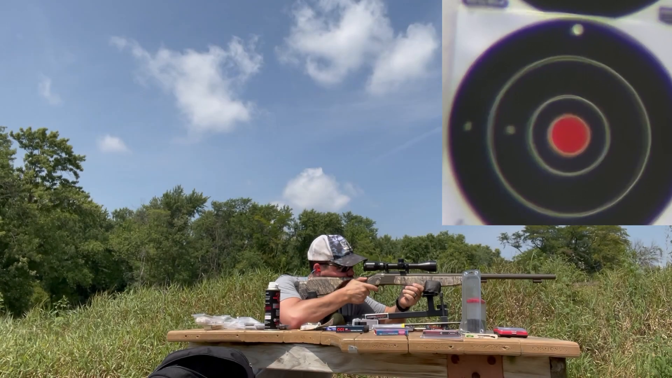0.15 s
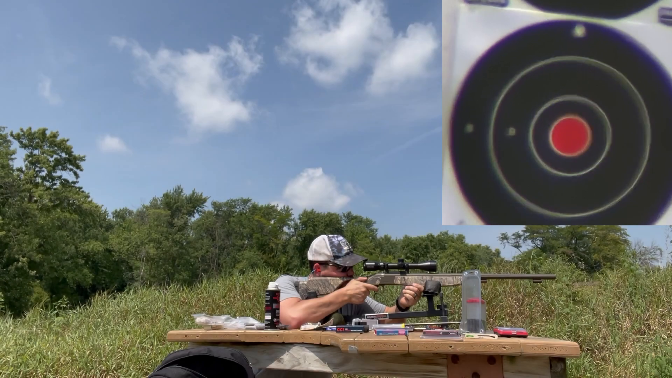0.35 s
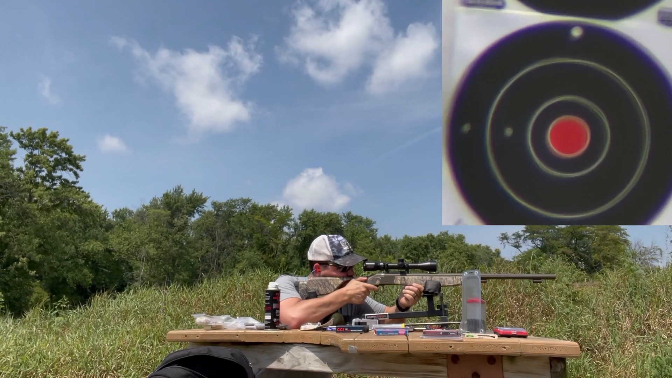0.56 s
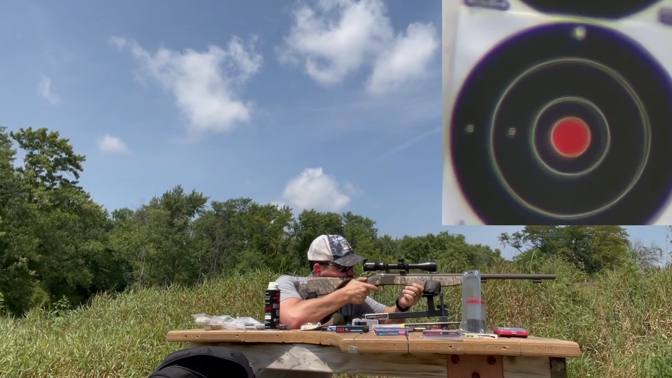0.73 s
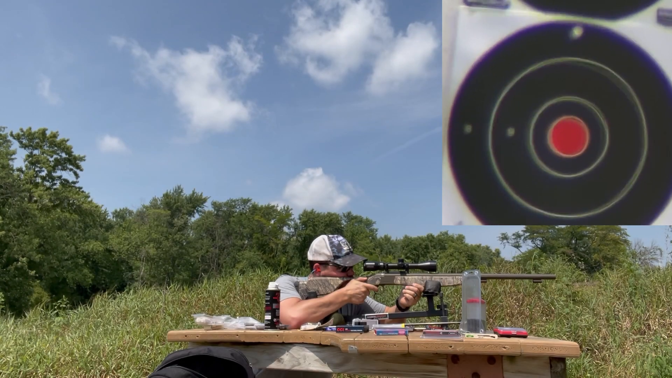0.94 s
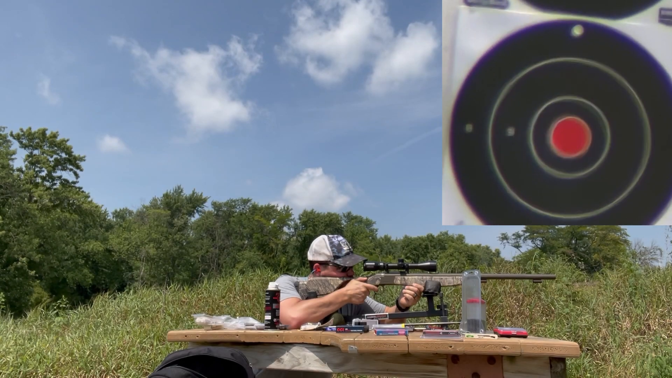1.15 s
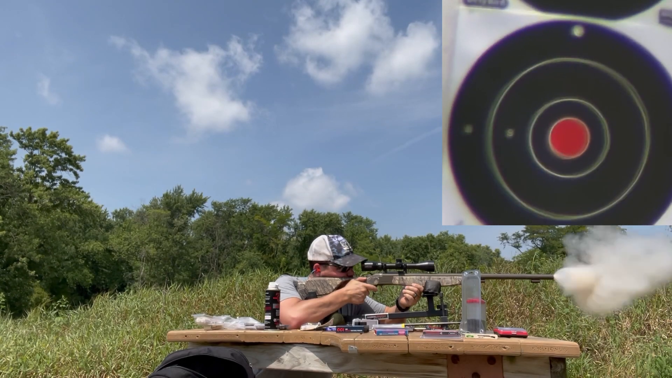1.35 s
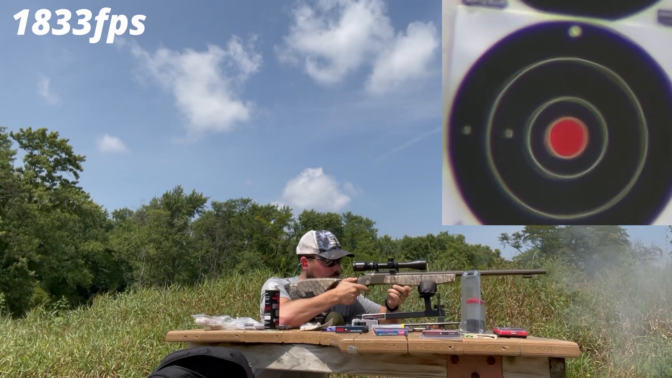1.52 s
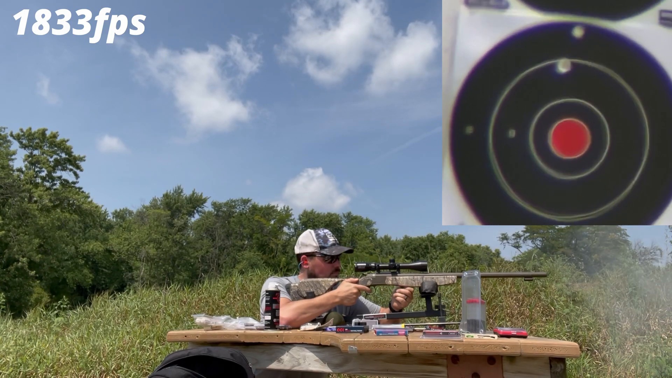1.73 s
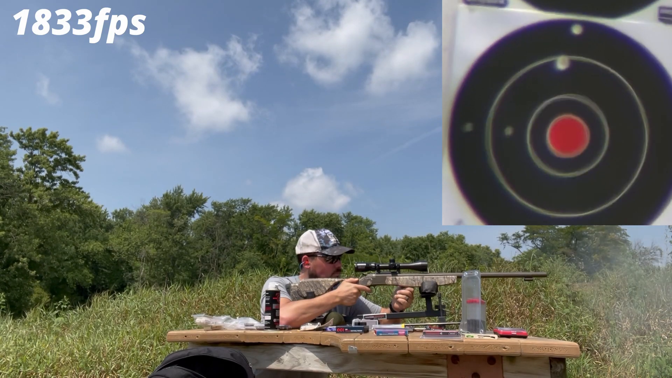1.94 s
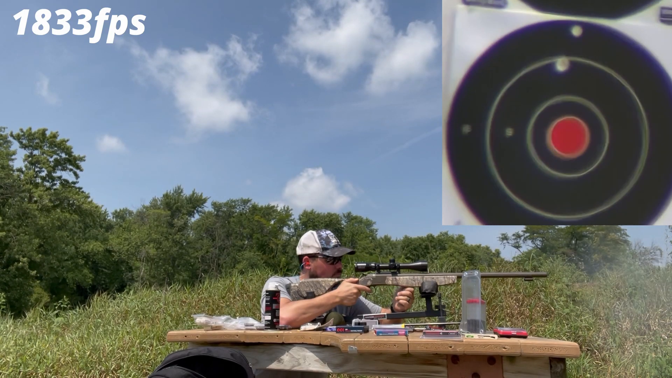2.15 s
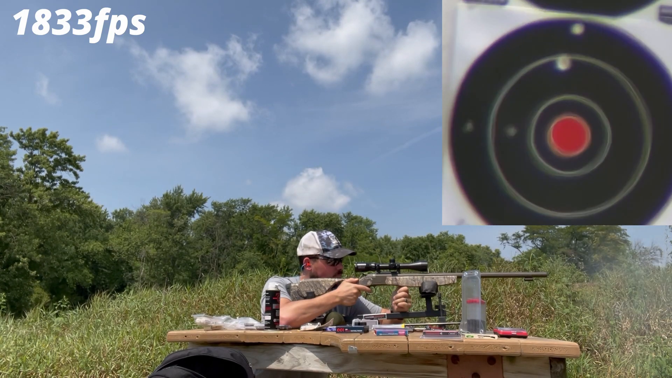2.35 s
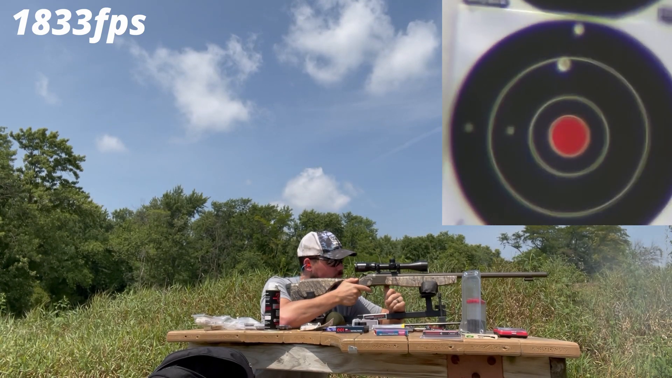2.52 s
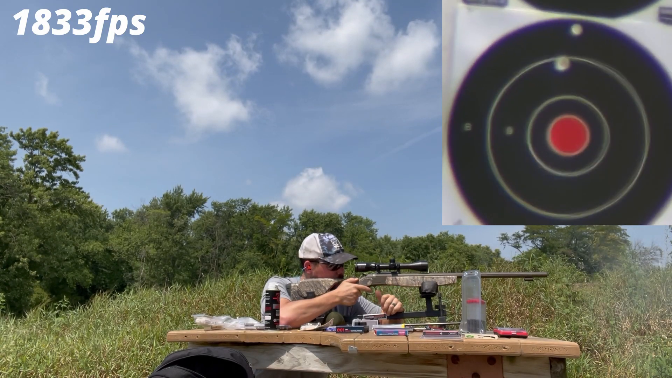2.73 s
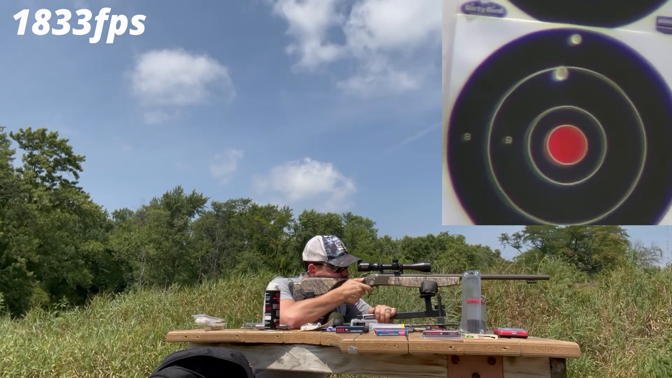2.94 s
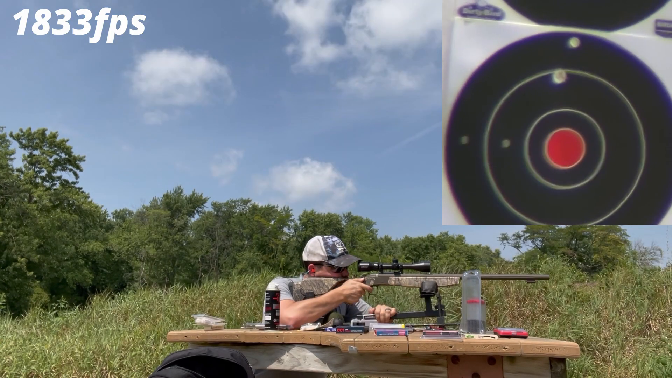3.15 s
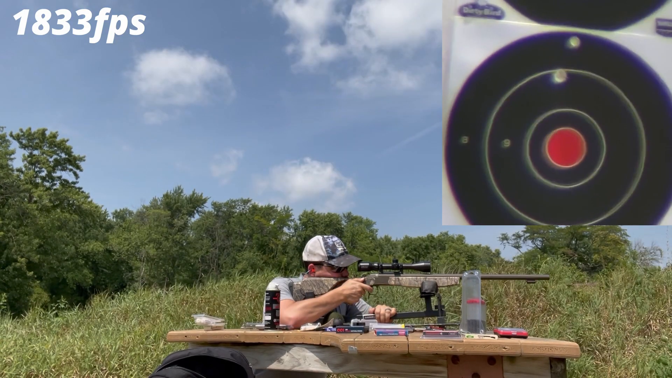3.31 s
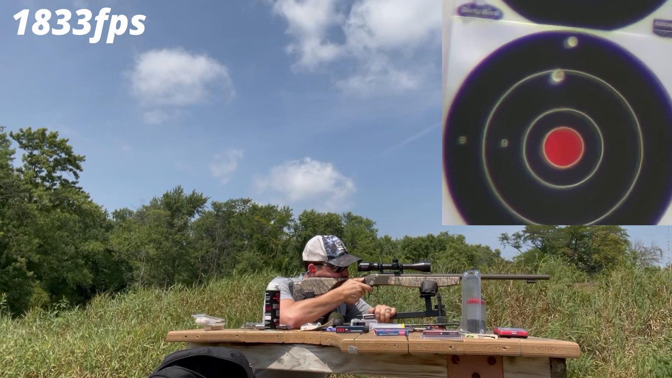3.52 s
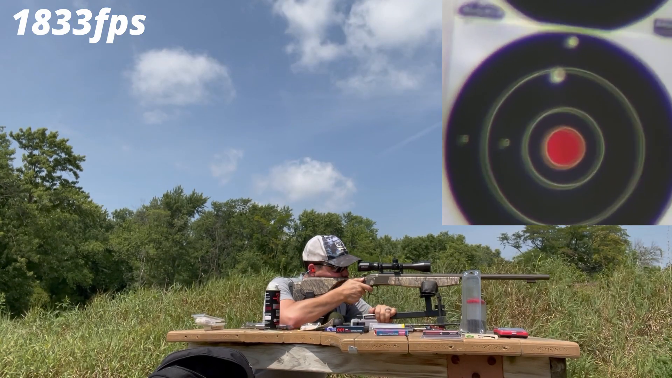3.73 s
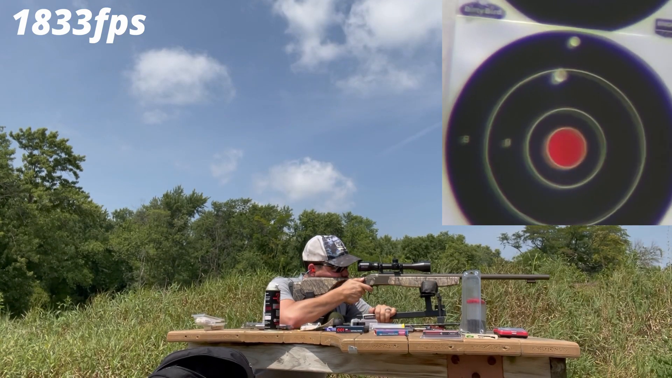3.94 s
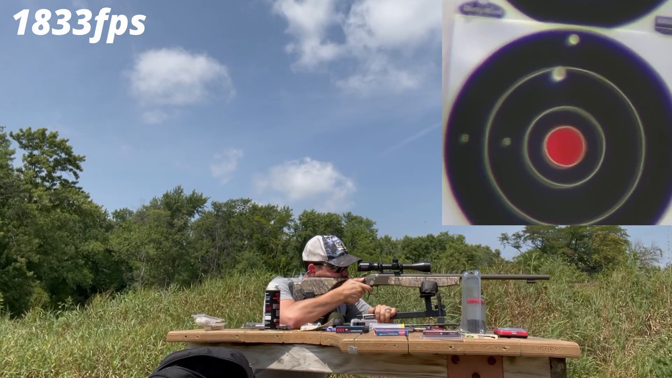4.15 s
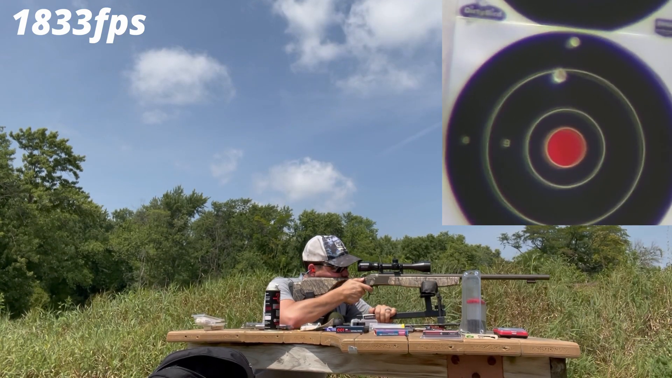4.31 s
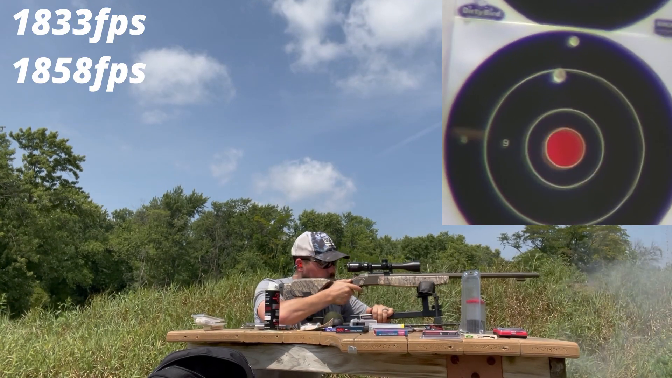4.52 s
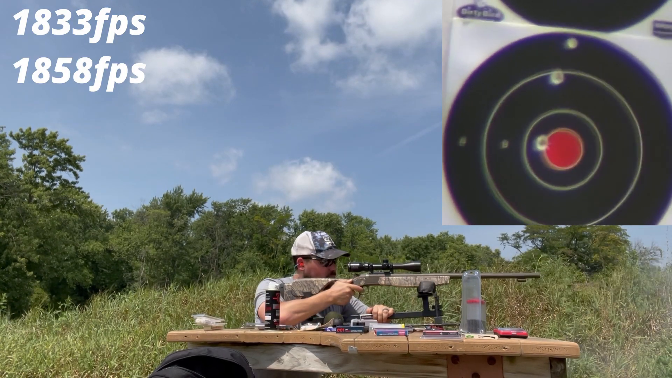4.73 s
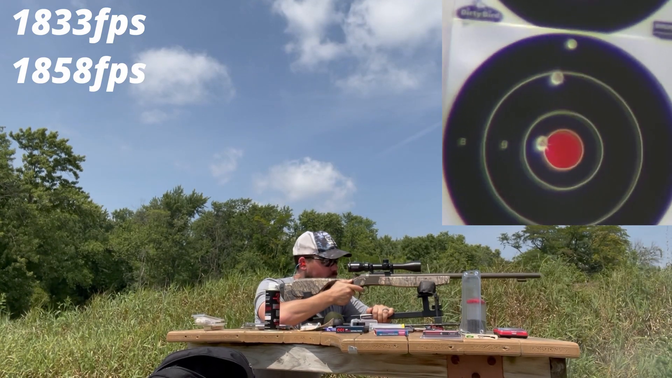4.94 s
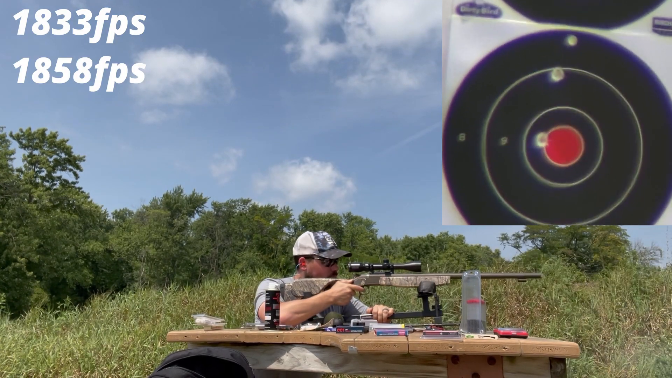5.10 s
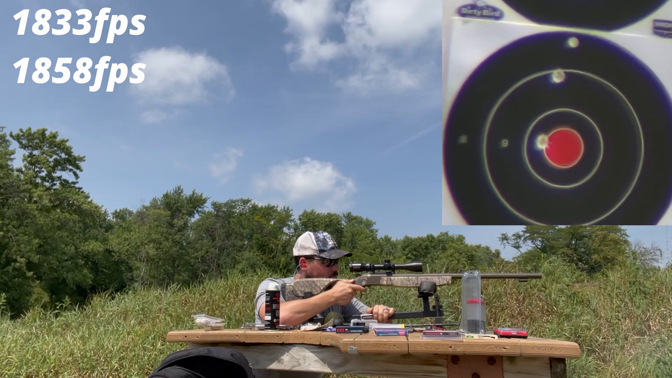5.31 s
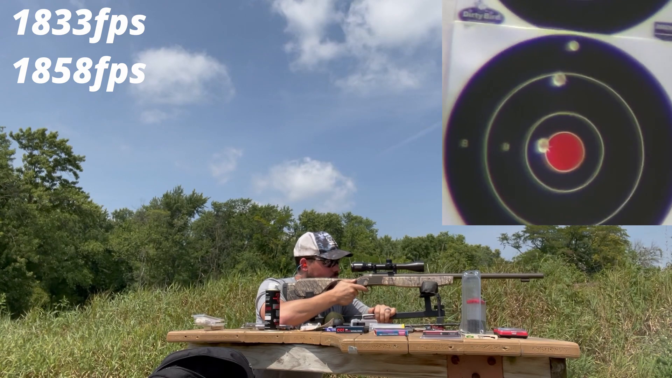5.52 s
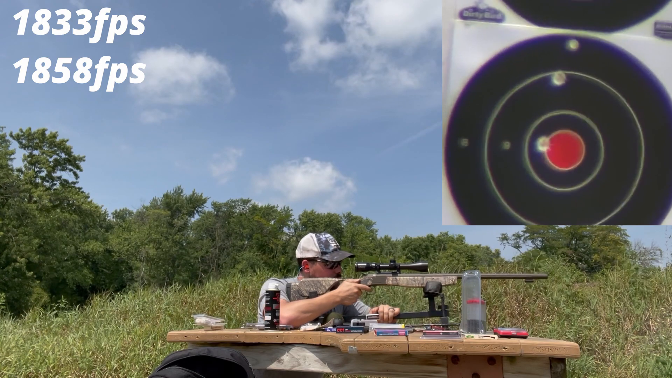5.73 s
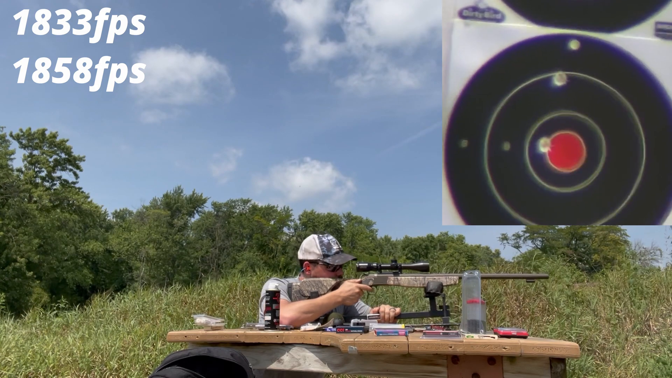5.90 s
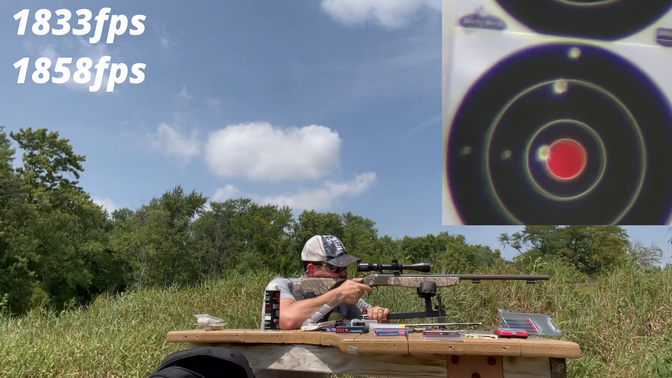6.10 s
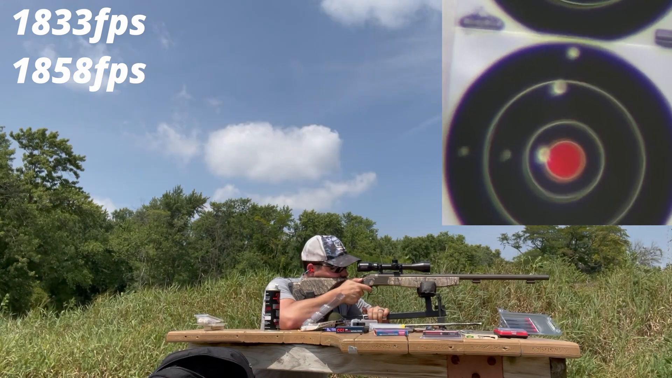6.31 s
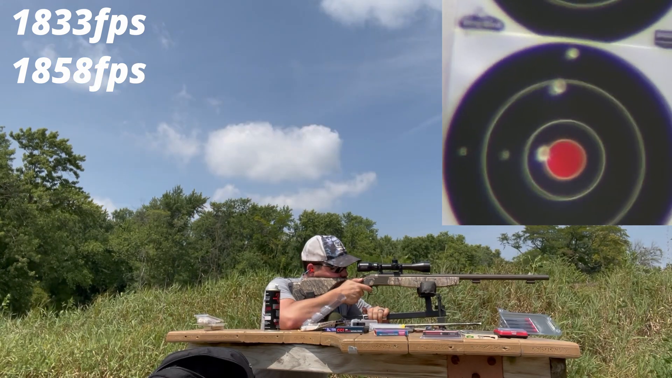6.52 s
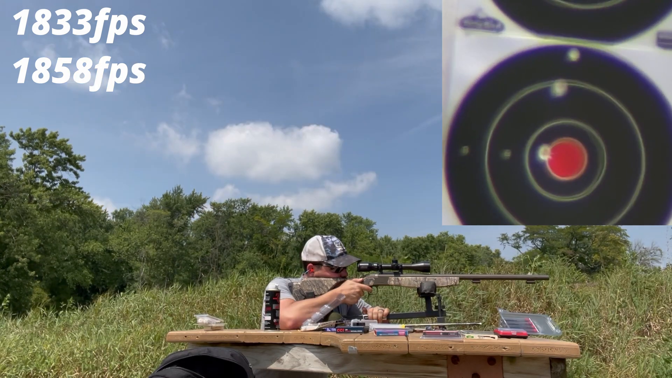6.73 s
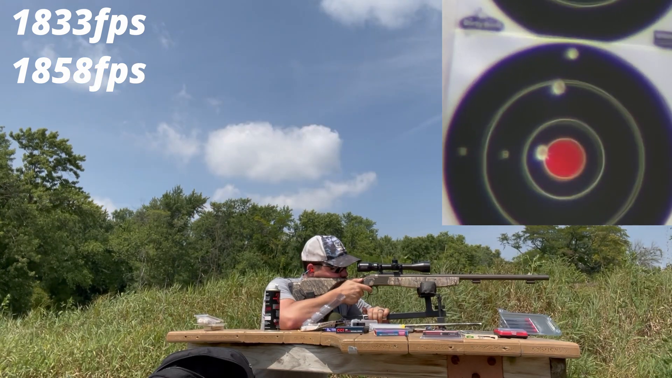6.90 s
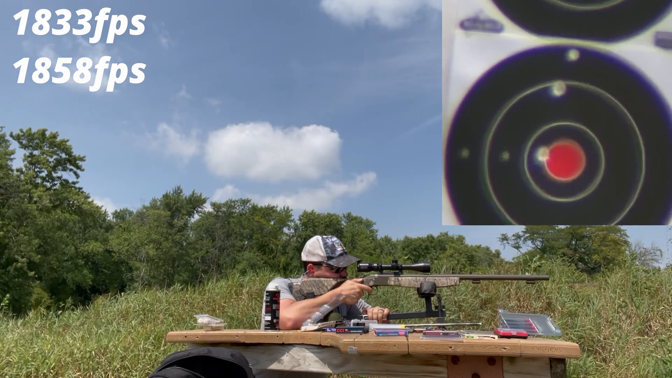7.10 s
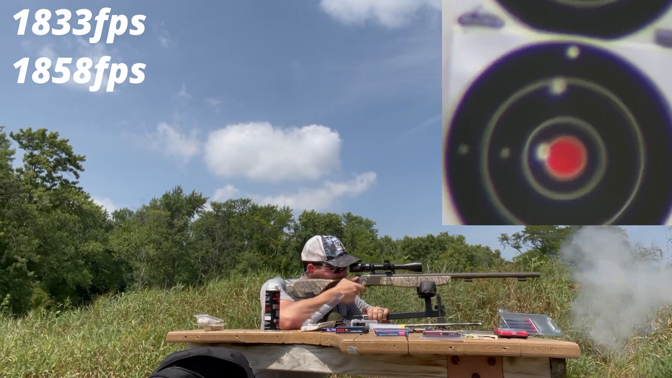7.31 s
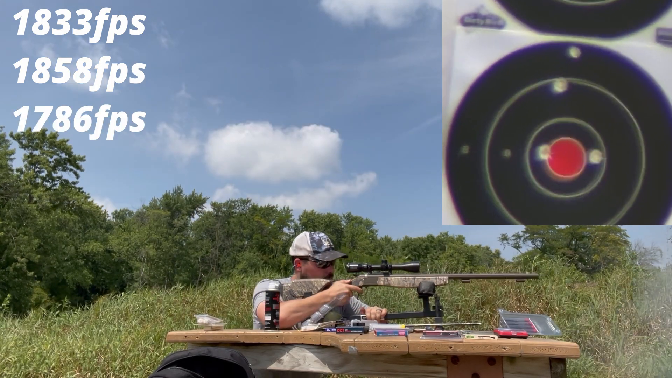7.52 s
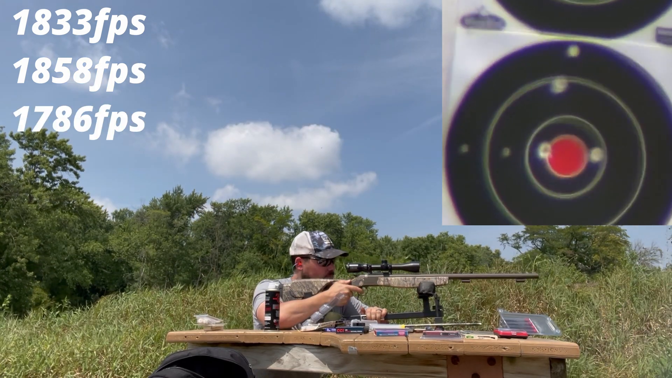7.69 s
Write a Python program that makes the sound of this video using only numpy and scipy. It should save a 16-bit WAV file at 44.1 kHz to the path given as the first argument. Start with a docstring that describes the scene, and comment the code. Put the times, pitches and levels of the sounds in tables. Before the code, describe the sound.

Three loud rifle shots crack and boom across a meadow, echoing off trees, with faint insect trills between and wind bumping the microphone later.

```python
"""In a summer meadow, insects trill and buzz; a thin chirp and dry ticks precede the first muzzleloader shot.
Each shot cracks as a sum of ringing partials, booms as a falling sine in noise bursts, then echoes from a tree
line as filtered noise; the insect sound is fainter at once, and slowly grows louder after a second.
A hard cut leads to a windier scene, with gusts and bumps of low noise, a shot, then three sine chirps.
Another cut leads to the strongest bumps on the microphone, then the third shot and its echoes."""
import sys
import numpy as np
from scipy import signal
from scipy.fft import rfft, irfft, next_fast_len
from scipy.io import wavfile
from scipy.ndimage import uniform_filter1d, map_coordinates

SR = 44100
rng = np.random.default_rng(int(sys.argv[2]) if len(sys.argv) > 2 else 0)


def inscribe(sig):
    """Save sig as 16-bit PCM at rate SR to the path in sys.argv[1].

    A 1-D sig is mono; a 2-D sig holds one channel per row.
    Samples are clipped to [-1, 1] before scaling.
    """
    pcm = np.round(np.clip(np.atleast_2d(sig).T, -1, 1) * 32767)
    wavfile.write(sys.argv[1], SR, pcm.astype(np.int16))


N = 346317

# Levels in the tables are relative: the functions add their own envelopes and gains.
# edges of the three scenes: [t/s]
SCENE_EDGES = [0, 2.974, 6.013, 7.86]
# shots: [t/s, ring length/s, rasp level/dB, gain of far echoes/dB, echo rumble level/dB,
#         extra echo delay/s, gain of sharp echoes/dB, gain of jolts/dB]
SHOTS = [(1.3498, 0.015, -15, 0, -10, -0.0019, 0, 0), (4.3601, 0.02, -18, 7, -11.5, 0.0026, 5, -4.5),
         (7.3277, 0.018, -19, 0, -10.5, -.001, -2.5, -25)]
# partials ringing in each crack: [f/Hz, left level/dB, right level/dB]
RING_FIRST = [(385, -28.5, -11), (570, -35, -28), (1103, -10.5, -22.5), (1256, -20, -24.5),
              (2030, -15, -28), (2640, -52, -25.5), (3000, -43, -31.5), (3149, -28.5, -44.5),
              (3400, -21, -25), (3520, -18, -32), (3900, -22, -40), (4020, -14.5, -21),
              (5130, -27.5, -35.5), (6040, -29, -29.5), (7500, -28.5, -33)]
RING_SECOND = [(719.6, -11.5, -6.5), (1076, -15, -22), (1140, -23, -34.5), (1458, -17, -45),
               (2540, -18, -46.5), (2750, -19, -47.5), (3000, -25.5, -60), (3610, -22.5, -46.5),
               (3940, -27, -22), (4380, -34.5, -16.5), (4430, -39, -40.5), (4720, -20.5, -34.5),
               (5520, -57.5, -29.5), (6653, -29.5, -26), (7800, -25, -36.5)]
RING_THIRD = [(495, -49.5, -24), (882, -10, -20), (1045, -16.5, -27), (1165, -27, -43), (1455, -21, -41),
              (1910, -19.5, -26), (2420, -22, -40), (2860, -24, -39), (3170, -18, -21.5), (3520, -23, -54),
              (3800, -52.5, -28), (4670, -25, -23), (5840, -42.5, -26), (7650, -29, -25), (7940, -30, -28)]
# muzzle gas behind each crack: [delay/s, puff level/dB, nominal boom f/Hz, boom level/dB,
#                                knock f/Hz, knock level/dB, thud level/dB]
BLASTS = [(.0185, -15.5, 97, -6, 280, -10, -23), (.0235, -18, 85, -3, 285, -7, -27.5),
          (0.018, -8, 110.6, -7.5, 320, -14.5, -24)]
# low jolts that follow each shot: [delay/s, smack level/dB, push level/dB]
JOLTS = [(0.062, -43.5, -31.5), (0.101, -64, -33), (.194, -44, -36)]
# broad surfaces that reflect each shot whole: [delay/s, level/dB, body level in the spectrum/dB]
REFLECTORS = [(.235, -33.5, 14), (.312, -32.5, -26), (.37, -23.5, -18), (.3935, -18, -4.5),
              (.454, -23, -11), (.529, -24.5, -7)]
# belts of growth that scatter each shot back: [delay/s, level/dB, rise/s, t60/s]
THICKETS = [(.095, -51.5, .01, 0.52), (.218, -33.5, 0.018, 0.24), (.325, -47, 0.014, .6),
            (0.36, -28.5, 0.023, 0.54), (.375, -35.5, .03, 3.9), (0.508, -34.5, 0.0078, 1.13)]
# insects in each scene: [trill f/Hz, trill level/dB, buzz level/dB, rasp level/dB, air level/dB]
INSECTS = [(4520, -63, -66.5, -83.5, -76), (4440, -67.5, -66.5, -82.5, -64.5), (4415, -62.5, -69, -83, -64)]
# thin chirps: [t/s, length of main swell/s, f/Hz, level/dB]
CHIRPS = [(0.113, .06, 3450, -82), (5.245, 0.05, 5040, -61), (5.568, 0.047, 5010, -64),
          (5.823, 0.072, 4980, -62.5)]
# faint dry ticks in the grass: [t/s, level/dB]
TICKS = [(0.7884, -67), (0.8415, -62), (0.8959, -60)]
# wind in each scene: [steady breeze level/dB, flutter level over rumble/dB, f/Hz below which the sound is mono]
BREEZES = [(-72, -15.5, 15), (-59, -21, 640), (-45.5, -10, 617)]
# gusts: [t of peak/s, strength level/dB, half width/s]
GUSTS = [(.2, -60, 0.077), (3.601, -32.5, .025), (3.709, -28, .06), (4.02, -44.5, 0.12),
         (4.158, -38, 0.017), (6.03, -36, 0.016), (6.22, -37, 0.071), (6.46, -38, .04), (6.72, -33, 0.079),
         (6.95, -40, .06), (7.25, -38.5, 0.095)]
# hard eddies that hit the microphone: [t/s, smack level/dB]
BUMPS = [(3.586, -57), (3.656, -41.5), (6.164, -36), (6.344, -39), (6.437, -31), (6.599, -22),
         (6.681, -20.5), (6.698, -21), (6.76, -34.5), (6.801, -33), (6.903, -35), (6.951, -21.5),
         (7.199, -27.5)]

# noise spectra of the shot and its ground: [f/Hz, level/dB per Hz]
CRACK_SPECTRUM = [(100, -25.5), (350, 1), (800, 4), (1400, -16.5), (3600, -5.5), (5200, -14.5),
                  (7800, -20.5), (8800, -44.5)]
SHOVE_SPECTRUM = [(20, -4.5), (60, 4.5), (200, -2.5), (400, -6.5), (800, -30)]
PUFF_SPECTRUM = [(40, -6.5), (250, -1.5), (600, -2.5), (1200, -3), (3000, -12), (6000, -19), (9000, -13),
                 (11200, -35), (13500, -22.5), (16000, -35)]
THUD_SPECTRUM = [(15, -19), (40, 5.5), (90, 2.5), (170, -6.5), (320, -18.5), (900, -53)]
GRASS_SPECTRUM = [(100, -16), (500, -17.5), (1400, -12.5), (1900, -1.5), (2650, 1.5), (3700, -11),
                  (8500, -11.5), (10200, -20.5), (11200, -41.5), (13500, -23.5), (16000, -38.5)]
# noise spectra of the scattered echo and its low roll: [f/Hz, level/dB per Hz]
ECHO_SPECTRUM = [(30, -30.5), (200, -16), (450, -8.5), (700, 0.5), (1200, 1.5), (1650, 0.5), (2100, 1),
                 (2550, 1.5), (3300, -4), (4400, -6.5), (5400, -9), (8500, -13), (11000, -44.5),
                 (16000, -43)]
ROLL_SPECTRUM = [(15, -31), (50, -6.5), (105, 2), (200, -0.5), (400, -15), (1200, -72)]
# noise spectra of a bump's push and smack: [f/Hz, level/dB per Hz]
PUSH_SPECTRUM = [(20, -13), (60, 6), (130, -4), (250, -22.5), (500, -31.5), (1200, -70.5)]
SMACK_SPECTRUM = [(90, -10.5), (220, 6.5), (380, 5), (560, -7.5), (950, -27.5), (1600, -44.5),
                  (4000, -80.5)]
# noise spectra of insect buzz, soft air and wind: [f/Hz, level/dB per Hz]
BUZZ_SPECTRUM = [(5500, -41.5), (6900, -19.5), (7600, -5.5), (8050, 1), (8250, -6.5), (8600, -2.5),
                 (8800, -10), (10000, -18), (11000, -51)]
AIR_SPECTRUM = [(30, 8.5), (300, 1.5), (1000, -4.5), (2500, -3.5), (3500, -5), (6000, -7.5), (9500, -4),
                (11200, -31.5), (13500, -7), (16000, -20)]
RUMBLE_SPECTRUM = [(12, -21), (35, -5.5), (75, 3.5), (140, -5.5), (220, -12), (400, -43.5), (900, -79.5)]
FLUTTER_SPECTRUM = [(60, -13.5), (170, -3), (280, 1.5), (450, -8.5), (700, -24), (1300, -40), (3000, -69.5)]
# treble loss as the echo path grows: [f/Hz, loss/dB per e-fold of the delay term]
DULLING = [(150, 4), (550, 0.5), (1200, 8), (2200, 22), (4500, 25), (9500, 52)]
# left-right correlation of sound from afar, then of sound from all round: [f/Hz, correlation/1]
ALIKE_AFAR = [(100, .15), (400, -0.2), (700, 0.75), (2000, 0.3), (8000, 0.6)]
ALIKE_AROUND = [(100, .1), (2500, .05), (8000, 0.46)]

FAR_S = .3  # thickets beyond this delay count as far
PUSH_DB = 4.5  # an eddy's low push, over the wind that carries it
PUFF_LAG_S = .00025  # the left channel carries the middle range of the puff slightly later
LAG_BAND_HZ = (595, 5840)  # the middle range, in which one channel lags the other
TOP_HZ = 15750  # band limit of the recorder


def crack(t, ring, length, rasp_db):
    """Superposition: wavering partials and harsh noise share one gate; a low shove follows as it closes."""
    gate = np.clip(t / (0.27 * length), 0, 1) ** 2 * amp(-60 * np.maximum(t - length, 0) / 0.02)
    channel_t = np.array([t - .00013, t])  # left channel late
    tones = 0
    for hz, left_db, right_db in ring:
        # the starting phase differs a little from channel to channel
        phase = rng.uniform(0, 2 * np.pi) + rng.normal(0, 0.45, (2, 1)) + 0.8 * wobble(t, 180)
        tones = tones + amp([[left_db], [right_db]]) * np.sin(2 * np.pi * hz * channel_t + phase)
    rasp = amp(rasp_db) * noise(t, CRACK_SPECTRUM, lag=.00016)
    shove_swell = amp(-12.5) * strike(t - length, rise=.005, t60=0.061)
    shove = shove_swell * noise(t, SHOVE_SPECTRUM, alike=[(100, 0.58)])
    return gate * (amp(1.5) * tones + rasp) + shove


def blast(t, puff_db, boom_hz, boom_db, knock_hz, knock_db, thud_db):
    """Expansion of muzzle gas: a bright puff, a boom of falling pitch, a hollow knock, thud and grass scatter."""
    puff_swell = amp(puff_db) * strike(t + 0.0029, rise=0.0038, t60=0.029)
    puff_swell = puff_swell + amp(-14.0) * strike(t + 0.0024, rise=0.0024, t60=0.11)
    puff = puff_swell * noise(t, PUFF_SPECTRUM, lag=PUFF_LAG_S)

    after = np.maximum(t, 0)
    # the pitch falls from nearly twice the nominal frequency to 0.7 of it
    cycles = boom_hz * (.7 * after + 0.36 * 0.024 * (1 - np.exp(-after / 0.0069)))
    boom = -amp(boom_db) * strike(t, rise=.0007, t60=0.059) * np.sin(2 * np.pi * cycles)

    knock_swell = amp(knock_db) * strike(t + 0.0051, rise=0.00067, t60=0.049)
    knock = knock_swell * np.sin(2 * np.pi * knock_hz * t)
    thud = amp(thud_db) * strike(t, rise=0.0051, t60=.3) * noise(t, THUD_SPECTRUM)
    grass = amp(-35.5) * strike(t, rise=.008, t60=0.7) * noise(t, GRASS_SPECTRUM, lag=.0002)
    return puff + boom + knock + thud + grass


def bump(smack_db, push_db):
    """Impulsive pressure on a microphone: a blow of air or a jolt gives a short smack on a soft low push."""
    t = np.arange(SR // 5) / SR
    push = amp(push_db + 3.5) * strike(t, rise=0.0028, t60=0.17) * noise(t, PUSH_SPECTRUM)
    swell = strike(t, rise=.002, t60=.085) ** 2
    return push + amp(smack_db + 5.5) * swell * noise(t, SMACK_SPECTRUM)


def slap(db, body_db):
    """Specular reflection: one broad surface throws the crack back whole, as a coloured noise burst."""
    t = np.arange(SR // 10) / SR
    colour = [(200, -26), (500, body_db), (1200, body_db), (2100, 6), (3100, -10.5),
              (4200, -7.0), (8500, -17.5), (11000, -44), (16000, -35.5)]
    burst = strike(t, rise=.0012, t60=.06) ** 2
    return amp(db) * burst * noise(t, colour, lag=0.000483) * pan(1.3)


def tree_line(t, far_db, rumble_db):
    """Diffuse scattering: trunks and leaves answer in clumps of varied colour, duller over longer paths."""
    hz, delay, z = signal.stft(noise(t, ECHO_SPECTRUM, lag=0.000469), SR, nperseg=256)
    loss_db = along(DULLING, hz)[:, None] * np.log((np.maximum(delay, .4) + .5) / 0.88)
    # smoothing over frequency, then time, makes patches of colour
    patches = uniform_filter1d(rng.standard_normal(z.shape), size=4, axis=0)
    patch_db = 2.7 * unit(uniform_filter1d(patches, size=8, axis=1))
    wash = signal.istft(z * amp(patch_db - loss_db), SR, nperseg=256)[1][:, :len(t)]

    scatter_db = 1.1 * wobble(t, 14) + 1.4 * wobble(t, 70) + .7 * wobble(t, 600)
    clumps = unit(amp(scatter_db / (.5 + t)))  # late echoes overlap and smooth out
    answers = [amp(db + far_db * (s > FAR_S)) * strike(t - s, rise, t60) for s, db, rise, t60 in THICKETS]
    envelope = np.linalg.norm(answers, axis=0)  # powers add
    roll = amp(rumble_db) * noise(t, ROLL_SPECTRUM) * unit(amp(1.2 * wobble(t, 6.6)))
    return envelope * (clumps * wash * pan(2.03) + roll)


def report(t, gas, far_db, rumble_db, late, sharp_db, jolt_db):
    """Direct sound before reflections: blast and jolts, then the answer of the same surroundings."""
    out = blast(t - gas[0], *gas[1:]) + tree_line(t - late, far_db, rumble_db)
    for delay, smack_db, push_db in JOLTS:
        add(out, delay, amp(jolt_db) * bump(smack_db, push_db))
    for delay, db, body_db in REFLECTORS:
        add(out, delay + late, slap(db + sharp_db, body_db))
    return out


def insects(t, since_shot, trill_hz, trill_db, buzz_db, rasp_db, air_db):
    """Amplitude modulation: trill, buzz, slow rasp and cricket over soft air, all fainter after the shot."""
    # level dip: full for 1 s after the shot, then slowly less
    dip = np.where(since_shot > 0, np.exp(-np.maximum(since_shot - 1, 0) / 3), 0)

    def pulses(rate, depth):
        """Sinusoidal modulation with a wandering phase."""
        return unit(1 + depth * np.sin(2 * np.pi * rate * t + wobble(t, 7.1)))

    offsets = [(-1100, -37.5), (-480, -11.5), (-200, -3), (3, -3), (218.5, 1.0), (481, -20), (1100, -40.5)]
    band = [(trill_hz + offset, db) for offset, db in offsets]
    # the two nearest singers stand out of their far neighbours
    near_trill = wing_strokes(t, 86, 1.012 * trill_hz, .16, -.00068)
    second_trill = wing_strokes(t, 77, .96 * trill_hz, .12, -.00068)
    singers = .62 * near_trill + .36 * second_trill + .7 * noise(t, band, lag=-.00068)
    trill = amp(trill_db - 22 * dip) * singers * pan(6.4)

    buzz = amp(buzz_db - 20 * dip) * pulses(54, .3) * noise(t, BUZZ_SPECTRUM)
    rasp_band = [(8300, -31.0), (9100, -6.5), (9500, -3.0), (9800, -8), (10400, -37.5)]
    rasp = amp(rasp_db - 10 * dip) * pulses(3.1, .7) * noise(t, rasp_band)
    cricket = amp(-77.0 - 7.6 * dip) * wing_strokes(t, 50, 8100, .05, -.00013)
    air = amp(air_db - 14 * dip) * noise(t, AIR_SPECTRUM, alike=ALIKE_AROUND)
    return amp(0.28 * wobble(t, 2.0)) * (trill + buzz + rasp + cricket) + air


def wing_strokes(t, rate, hz, fall, lag):
    """Stridulation: every wing stroke is a short tone that slides down by the share fall."""
    stroke = (rate * t + 0.098 * wobble(t, 3.5)) % 1
    pitch = hz * (1 + fall * (.5 - stroke) + .015 * wobble(t, 60))
    swell = np.sin(np.pi * stroke) ** 2 * amp(1.4 * wobble(t, 30))
    song = swell * np.sin(2 * np.pi * np.cumsum(pitch) / SR)
    return unit(np.array([np.roll(song, round(lag * SR)), song]))  # a negative lag: the left channel leads


def chirp(length, hz, db):
    """Phase modulation: a thin, nearly pure note from the meadow, with a weak tail."""
    t = np.arange(SR // 5) / SR
    swell = np.sin(np.pi * np.minimum(t / length, 1)) + 0.37 * strike(t, rise=.03, t60=0.35)
    return amp(db) * swell * np.sin(2 * np.pi * hz * t + 0.91 * wobble(t, 115))


def tick(db):
    """A transient of high-band noise: a tiny high tick."""
    t = np.arange(SR // 10) / SR
    colour = [(5000, -30), (10000, -14), (13500, 7), (16000, -13)]
    return amp(db) * strike(t, rise=0.0033, t60=0.053) * noise(t, colour)


def wind(t, since_shot, breeze_db, flutter_db):
    """Turbulence at a microphone: one strength drives low rumble and lumpy flutter, over a faint far drone."""
    rumble = noise(t, RUMBLE_SPECTRUM, alike=ALIKE_AROUND) * unit(amp(2.4 * wobble(t, 23)))
    lumps = unit(amp(4.8 * wobble(t, 50)))
    flutter = amp(flutter_db) * noise(t, FLUTTER_SPECTRUM, alike=ALIKE_AROUND) * lumps
    drone_colour = [(20, -13.0), (70, 1.5), (180, -6.5), (400, -13.5), (1500, -26.5), (4000, -51)]
    drone = amp(-72.5) * noise(t, drone_colour, alike=ALIKE_AROUND)
    after_shot = amp(-8 * (since_shot > 0))  # rumble and flutter are fainter after the shot
    out = wind_strength(t, breeze_db) * (rumble + flutter) * after_shot + drone
    for s, smack_db in BUMPS:
        if t[0] <= s < t[-1]:
            push_db = PUSH_DB + 20 * np.log10(wind_strength(s, breeze_db))
            add(out, s - t[0], bump(smack_db, push_db))
    return out


def wind_strength(t, breeze_db):
    """Addition of powers: gusts swell and ebb on top of the steady breeze."""
    power = sum((amp(db) / (1 + ((t - s) / width) ** 2)) ** 2 for s, db, width in GUSTS)
    return np.sqrt(amp(breeze_db) ** 2 + power)


def noise(t, spectrum, lag=0, alike=ALIKE_AFAR):
    """Filtered, correlated stereo noise of rms 1; the left channel's middle range comes lag seconds late."""
    size = next_fast_len(len(t) + 4096)
    hz = np.fft.rfftfreq(size, 1 / SR)
    mid, side = rfft(rng.standard_normal((2, size))) * amp(along(spectrum, hz))
    turn = np.arccos(np.clip(along(alike, hz), -1, 1)) / 2  # mid-side balance sets the correlation
    mid, side = mid * np.cos(turn), side * np.sin(turn)
    in_band = (hz > LAG_BAND_HZ[0]) * (hz < LAG_BAND_HZ[1])
    late = np.exp(-1j * np.pi * hz * lag * in_band)  # half the lag on each channel
    return unit(irfft([(mid + side) * late, (mid - side) / late], size)[:, :len(t)])


def strike(t, rise, t60):
    """Exponential growth and decay: an envelope that starts at t = 0, rises and dies away."""
    t = np.maximum(t, 0)
    return (1 - np.exp(-t / rise)) * amp(-60 * t / t60)


def wobble(t, rate):
    """Interpolated randomness: a smooth curve through rate random knots a second."""
    knots = (t - t[0]) * rate
    return map_coordinates(rng.standard_normal(int(knots[-1]) + 4), [knots])


def along(points, hz):
    """Logarithmic frequency scale: (f/Hz, value) points read on a log axis."""
    f, v = np.transpose(points)
    return np.interp(np.log(hz + 1), np.log(f + 1), v)


def amp(db):
    """The decibel: level to amplitude gain."""
    return 10 ** (np.asarray(db) / 20)


def unit(x):
    """Normalisation: scale to rms 1."""
    return x / np.sqrt(np.mean(x ** 2) + 1e-20)


def pan(right_db):
    """Level difference between the channels: right over left."""
    return amp(np.array([[-right_db], [right_db]]) / 2)


def add(track, s, sound):
    """Linear superposition: mix a sound into the track at time s."""
    room = track[:, max(round(s * SR), 0):][:, :sound.shape[-1]]
    room += sound[..., :room.shape[1]]


def mono_bass(x, hz):
    """Full correlation at low frequency: both channels carry the left one's bass below hz."""
    bass = signal.sosfiltfilt(signal.butter(4, hz, fs=SR, output="sos"), x)
    return x - bass + bass[0]


def scene():
    """Succession and superposition: three stretches of meadow, each with its shot, cut end to end."""
    out = np.zeros((2, N))
    rings = (RING_FIRST, RING_SECOND, RING_THIRD)
    stretches = zip(SCENE_EDGES, SCENE_EDGES[1:], SHOTS, BLASTS, rings, BREEZES, INSECTS)
    for start, end, shot, gas, ring, breeze, chorus in stretches:
        s, length, rasp_db, *echoes = shot
        breeze_db, flutter_db, mono_hz = breeze
        t = np.arange(round((end - s) * SR)) / SR  # time since the shot
        clock = start + np.arange(round((end - start) * SR)) / SR
        meadow = insects(clock, clock - s, *chorus) + wind(clock, clock - s, breeze_db, flutter_db)
        add(meadow, s - start, report(t, gas, *echoes))
        add(out, start, mono_bass(meadow, mono_hz))
        add(out, s, crack(t[:SR // 10], ring, length, rasp_db))
    for s, db in TICKS:
        add(out, s, tick(db))
    for s, length, hz, db in CHIRPS:
        add(out, s, chirp(length, hz, db))
    return out


def record(dry):
    """Saturation and band limiting: the recorder rounds off the highest peaks and cuts the top of the band."""
    held = dry / (1 + np.abs(dry / .98) ** 8) ** (1 / 8)
    return signal.sosfilt(signal.ellip(10, .1, 80, TOP_HZ, fs=SR, output="sos"), held)


dry = scene()
out = record(dry)
inscribe(out)
```